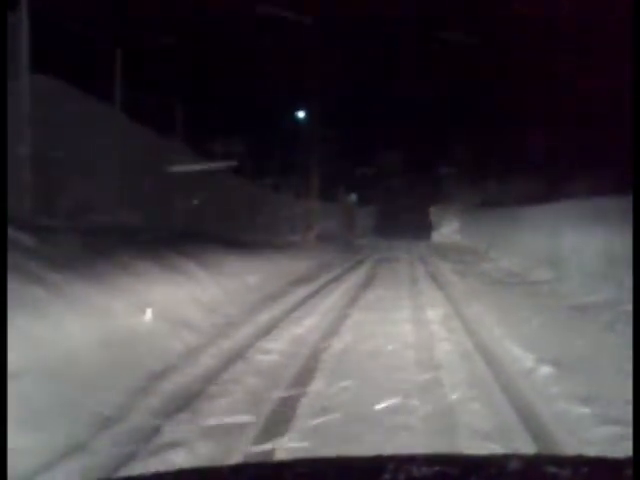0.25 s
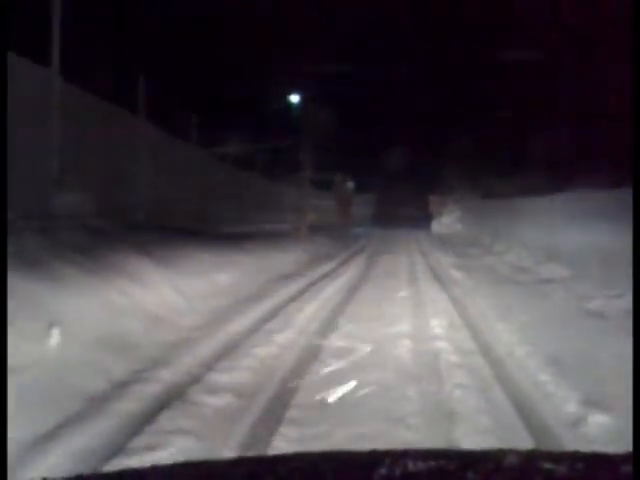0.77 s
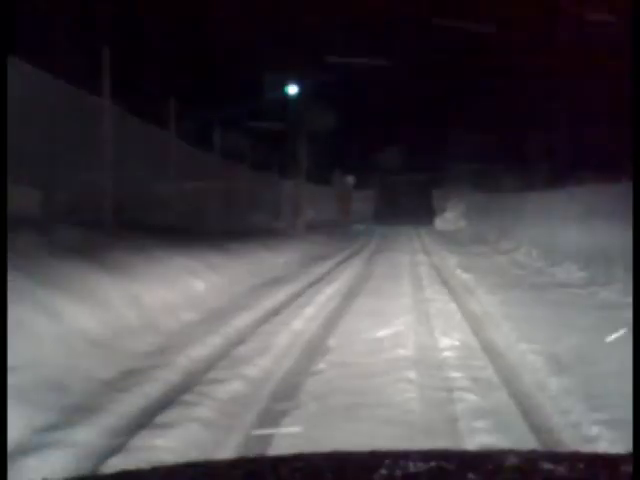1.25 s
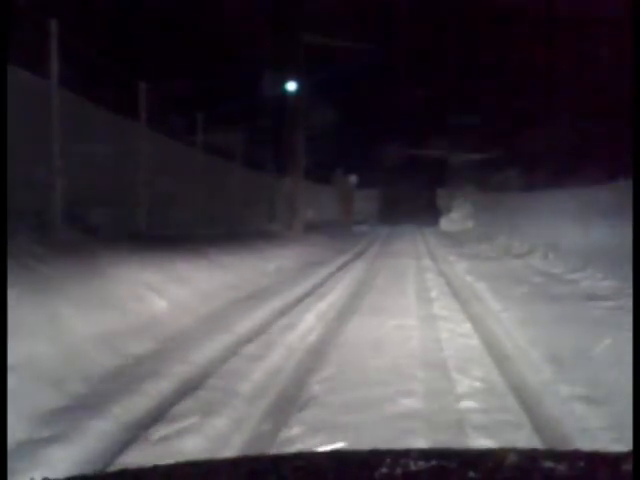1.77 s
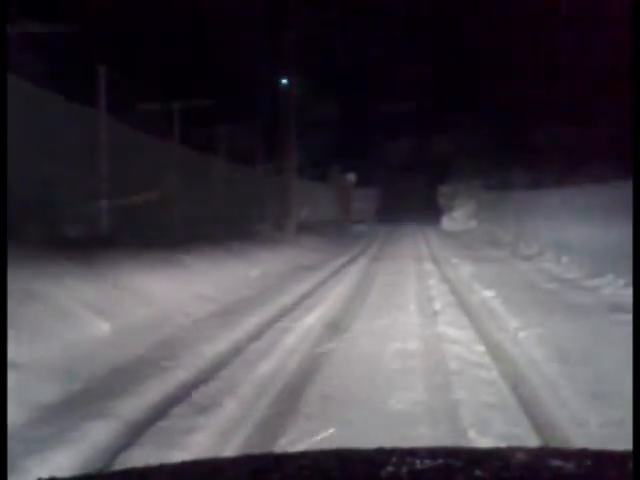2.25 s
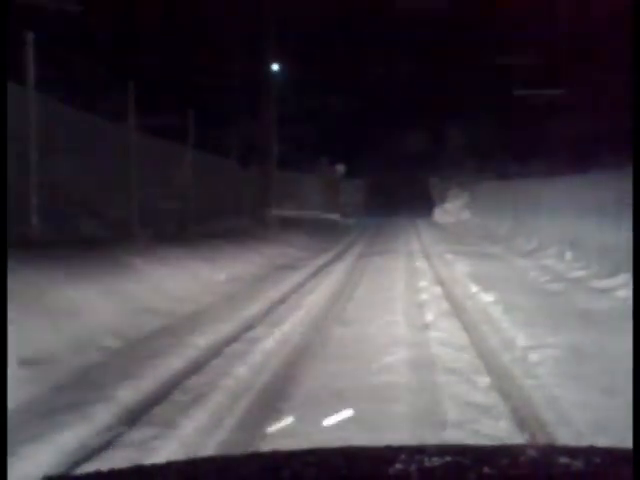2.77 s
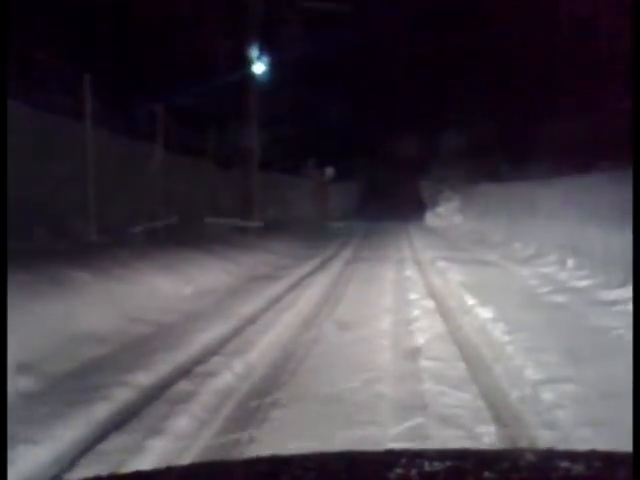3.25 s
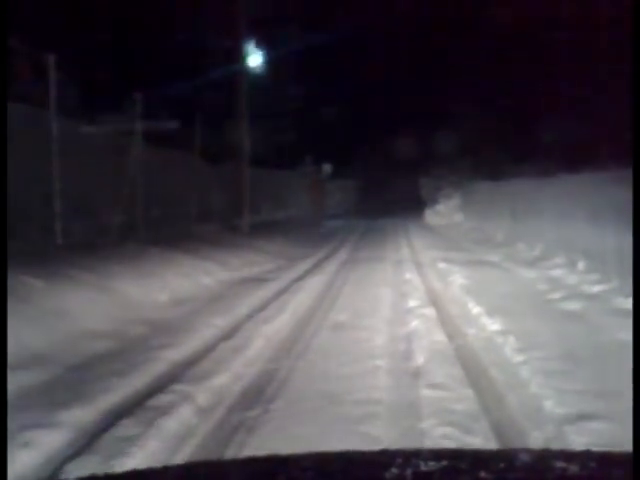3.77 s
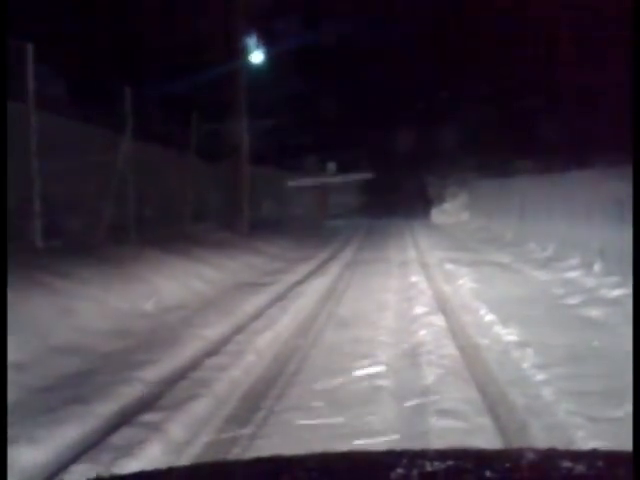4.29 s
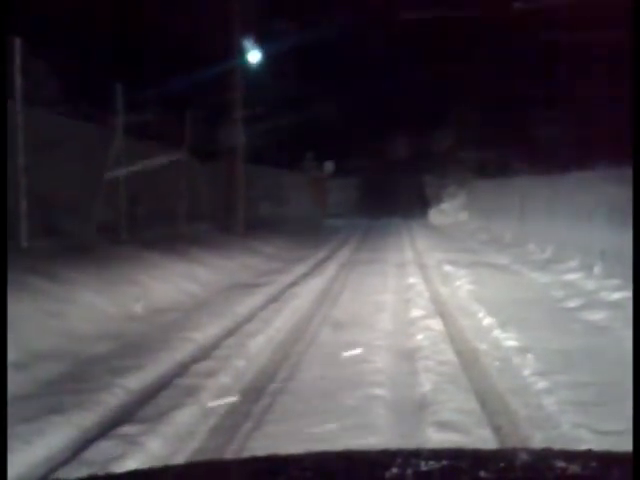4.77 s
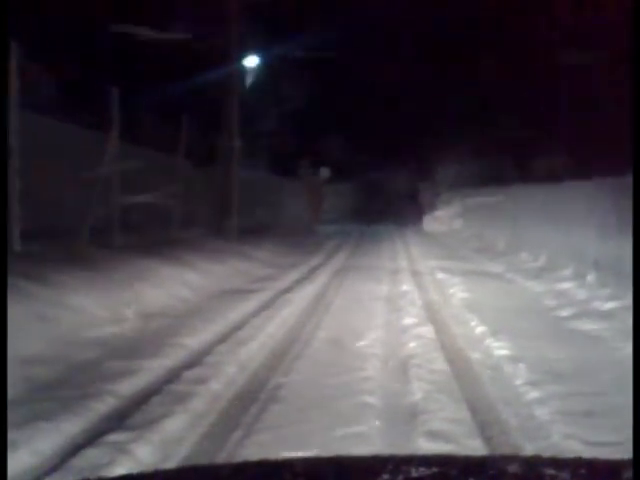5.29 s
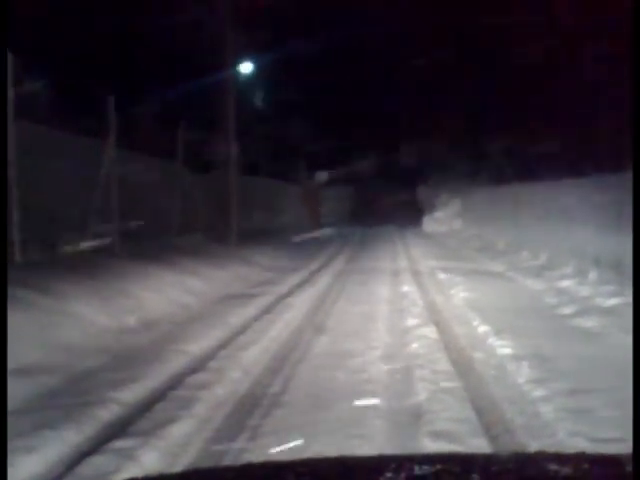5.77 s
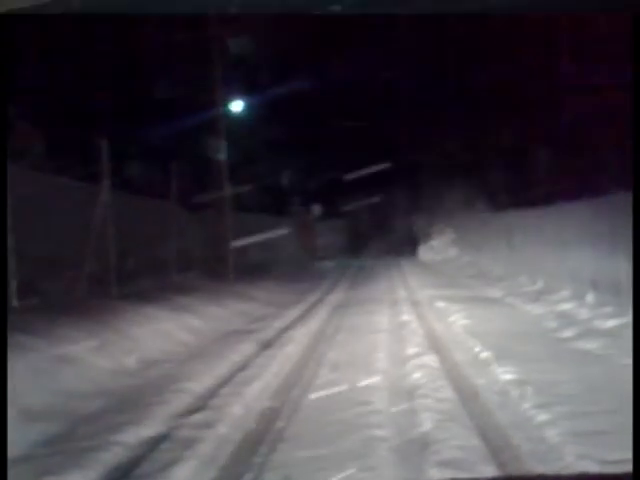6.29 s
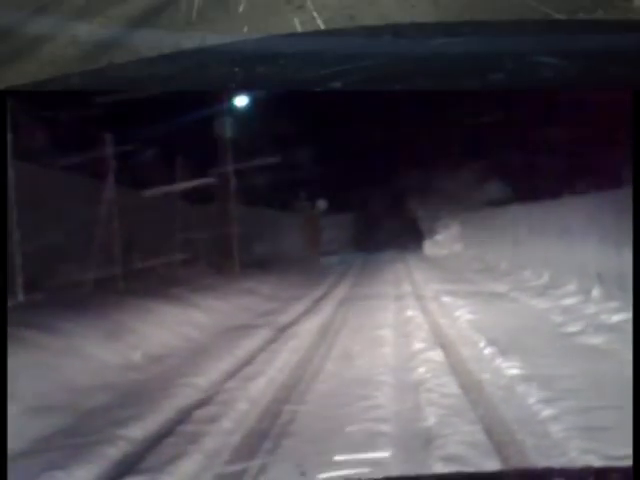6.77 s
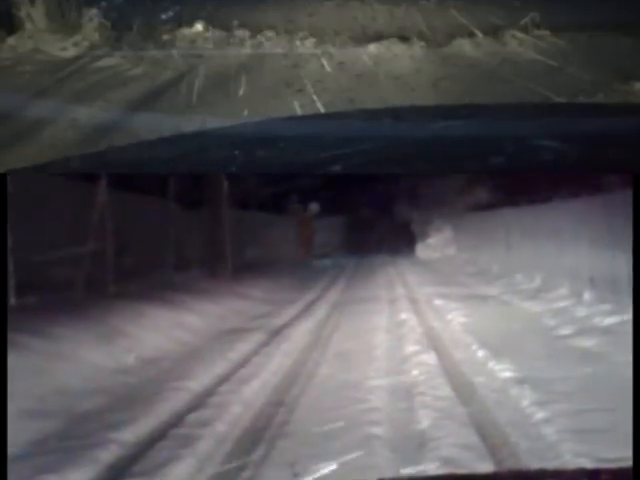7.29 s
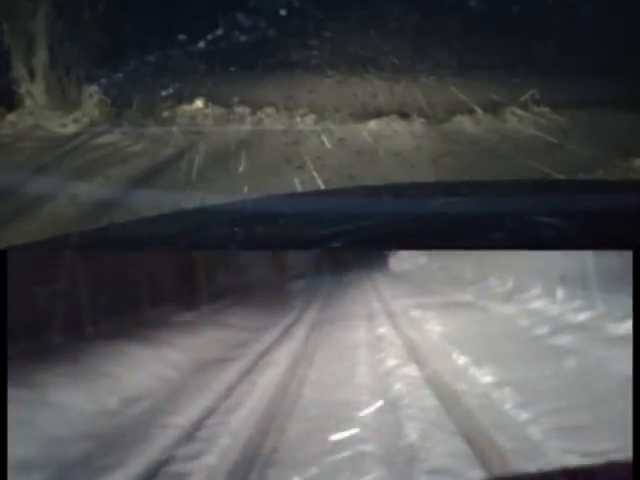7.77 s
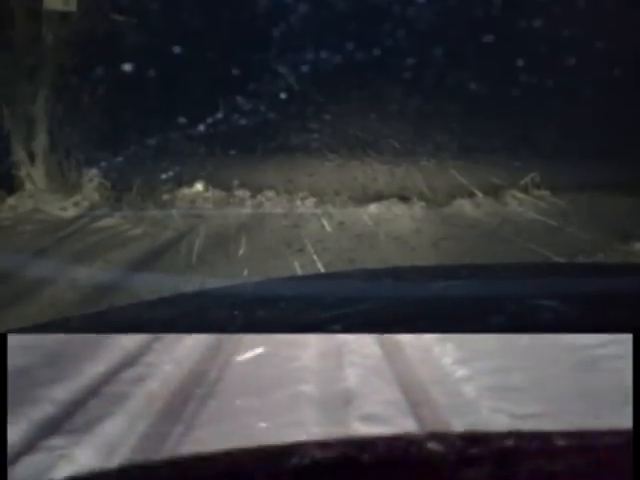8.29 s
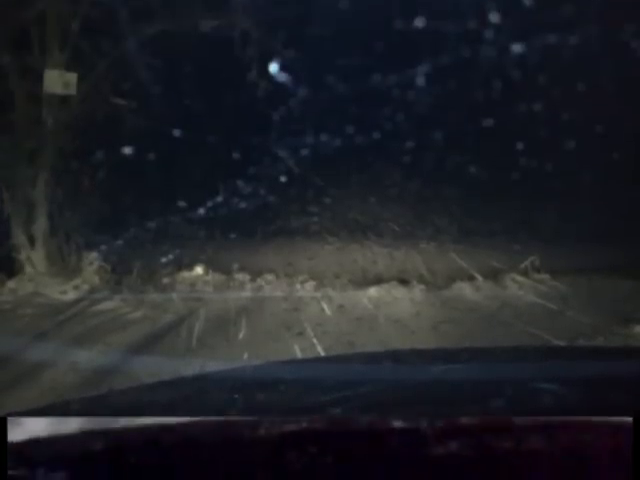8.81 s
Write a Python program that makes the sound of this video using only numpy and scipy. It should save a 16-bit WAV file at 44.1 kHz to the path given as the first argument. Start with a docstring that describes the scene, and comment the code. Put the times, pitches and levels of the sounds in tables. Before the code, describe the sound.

A close, boxy car-cabin sound, dominated by low frequencies. Engine drone surges several times, slides down in pitch and settles into idle, with tyre roar, faint snow hiss and a steady blower tone. Muffled thumps come and go. Then one dense burst of sharp knocks shakes the dashboard, followed by scattered trim rattles, panel knocks, brief squeaks and soft snow brushing as engine and road noise sink towards silence.

```python
"""Inside a car rolling slowly along a snowy road: the engine booms over humps, then drops to idle.
Swept sines make the engine and heater fan; shaped noise makes tyre rumble, roar and snow hiss throughout.
Trim noise bursts tick, gliding tones creak and snow swishes; soon ruts thump as short decaying sines.
Late on, a loose panel rings and a hard jolt sets the dashboard's modes clattering;
from then the running noise sinks steadily while thumps, rattles, creaks and swishes go on."""
import sys
import numpy as np
from scipy import signal
from scipy.fft import rfft, irfft, next_fast_len
from scipy.io import wavfile

SR = 44100
rng = np.random.default_rng(int(sys.argv[2]) if len(sys.argv) > 2 else 0)


def log_audio(samples):
    """Write samples as a 16-bit WAV file to the path given in sys.argv[1]."""
    # one column per channel
    frames = np.atleast_2d(samples).T
    # limit to full scale, then quantise
    limited = np.clip(frames, -1, 1)
    pcm = np.round(limited * 32767).astype(np.int16)
    wavfile.write(sys.argv[1], SR, pcm)


N = 398663
TIME = np.arange(N) / SR

# tread roar spectrum, also excited by ruts: freq_hz, relative density_db
TREAD_ROAR = [(70, -8), (130, -3.5), (188, -2.5), (260, -8), (320, -3), (380, -6), (450, -11.5), (520, -17),
              (620, -17), (720, -20), (900, -25.5), (1000, -27.5), (1050, -32), (1110, -26), (1220, -34.5),
              (1280, -33), (1400, -38), (1480, -35.5), (1580, -38.5), (2130, -48), (3900, -81)]


def from_db(db):
    """Decibels to amplitude gain."""
    return 10 ** (np.asarray(db) / 20)


def rms_one(x):
    """Scale to unit rms."""
    return x / np.sqrt(np.mean(x ** 2) + 1e-20)


def in_time(rows):
    """Interpolate each column of a time curve at every sample."""
    time_s, *columns = np.transpose(rows)
    return [np.interp(TIME, time_s, column) for column in columns]


def at_hz(points, hz):
    """Interpolate a spectrum in dB on a log-frequency axis."""
    freqs_hz, levels_db = np.transpose(points)
    return np.interp(np.log(hz), np.log(freqs_hz), levels_db)


def coloured(x, spectrum):
    """Filter a steady signal by a spectrum with steep outer edges; unit rms."""
    size = next_fast_len(N, True)
    hz = np.maximum(np.arange(size // 2 + 1) * SR / size, 1)
    low_edge = 1 / (1 + (spectrum[0][0] / hz) ** 4)
    high_edge = 1 / (1 + (hz / spectrum[-1][0]) ** 8)
    gain = from_db(at_hz(spectrum, hz)) * low_edge * high_edge
    return rms_one(irfft(rfft(x, size) * gain, size)[:N])


def noise(spectrum):
    """Gaussian noise of a given spectrum, unit rms."""
    return coloured(rng.standard_normal(N), spectrum)


def drift(rate_hz):
    """Slow random wander of about unit rms: two-pole low-passed noise."""
    step = 40  # samples per control point
    pole = np.exp(-2 * step * np.pi * rate_hz / SR)
    white = rng.standard_normal(N // step + 2002)
    slow = signal.lfilter([1], [1, -2 * pole, pole * pole], white)[2000:]  # drop the settling
    return np.interp(np.arange(N) / step, np.arange(len(slow)), rms_one(slow))


def ring(force, hz, t60_s):
    """Two-pole resonator: a unit click starts a decaying sine of height about 1."""
    radius = from_db(-60 / (t60_s * SR))
    angle = 2 * np.pi * hz / SR
    poles = [1, -2 * radius * np.cos(angle), radius * radius]
    return signal.lfilter([0, np.sin(angle)], poles, force + 1e-18)


def burst(start_s, length_s, rise_s, t60_s):
    """Sample span and envelope of a contact that rises, holds and decays."""
    t = np.arange(int((length_s + t60_s) * SR)) / SR
    at = round(start_s * SR)
    rise = 1 - np.exp(-t / rise_s)
    decay = np.exp(-np.log(1000) * np.maximum(t - length_s, 0) / t60_s)
    return slice(at, min(at + len(t), N)), (rise * decay)[:N - at]


def engine(overtone_db=-35.0, uneven_db=-9.0, waver_db=2.0):
    """Firing tone and overtones sweep through the cabin boom; unequal cylinders add half orders."""
    # engine speed: time_s, firing_hz
    firing_curve = [(0, 53.23), (.4, 54.81), (1.5, 55.88), (1.94, 53.56), (2.14, 50.65), (3.1, 45.78),
                    (3.42, 36.94), (3.9, 35.32), (5.13, 35.59), (5.36, 33.05), (6.02, 34.43), (9.04, 32.65)]
    # exhaust and cabin response to overtones: freq_hz, gain_db
    boom = [(48, -2), (68, 1), (100, -16), (132, -8), (160, -12), (182, 3), (203, 0), (230, -17),
            (305, -4.5), (400, -20.5), (700, -31.5)]
    idle_hz, idle_db = 34, -26.5
    load_db_per_octave, throb_db_per_octave = -2, 3.5  # level slope; unsteadiness above idle
    slack_at_s, slack_half_width_s, slack_db = 2.6, .06, -14  # brief dropout on the way to idle

    hz, = in_time(firing_curve)
    phase = 2 * np.pi * np.cumsum(hz) / SR
    load_octaves = np.log2(hz / idle_hz)
    load_db = load_octaves * (load_db_per_octave + throb_db_per_octave * drift(6.7))
    dropout_db = slack_db * np.exp(-((TIME - slack_at_s) / slack_half_width_s) ** 2)
    out = from_db(idle_db + load_db + humps() + dropout_db) * np.sin(phase)
    for k in range(3, 25):  # k counts half orders; the firing tone is k = 2
        half = k % 2 and k > 3  # k = 3 is not reduced
        gain_db = overtone_db + at_hz(boom, hz * k / 2) + uneven_db * half + waver_db * drift(2.5)
        out += from_db(gain_db) * np.sin(phase * k / 2 + rng.uniform(0, 2 * np.pi))
    return np.sqrt(2) * out  # sine levels are rms


def humps():
    """Swell in dB as snow humps load the drive and shake the body."""
    # snow humps: centre_s, gain_db
    hump_rows = [(.08, 11), (.3, 8), (.55, 5.5), (.69, 15), (.81, 5), (1.02, 11), (1.39, 9.5), (1.6, 10.5),
                 (1.85, 8.5), (2.75, 5), (2.88, 7), (2.99, 5), (3.15, 4)]
    half_width_s = 0.055
    return sum(db * np.exp(-((TIME - s) / half_width_s) ** 2) for s, db in hump_rows)


def jolt(crack_db=-13.5, crack_t60_s=0.046, ring_db=-13.5):
    """A volley of blows: each cracks brightly and excites the dashboard's modes."""
    # blows of the jolt: start_s, relative level_db
    blows = [(6.134, -5), (6.140, -3.5), (6.146, 0), (6.151, -1.5), (6.157, 1), (6.164, -1.5), (6.168, 0),
             (6.173, -3), (6.179, 2), (6.185, -4), (6.191, -11.5), (6.198, 0), (6.205, -11), (6.209, -10)]
    # dashboard modes: freq_hz, relative level_db, t60_s
    dash_modes = [(97.3, -4, 0.12), (118, -8.5, .2), (160.4, -2.5, 0.084), (219.2, -8, 0.05),
                  (254, -7, 0.1), (287, 2, 0.085), (378, -6.5, 0.21), (421, -4.5, 0.046), (474, 2.5, 0.1),
                  (492, -6.5, 0.08), (539, -11, .06), (639, -16.5, 0.087), (960, -21.5, 0.18),
                  (1470, -23.5, 0.055), (2800, -18.5, .045), (3080, -19, .04), (3160, -18.5, .045),
                  (3430, -21.5, 0.045), (4130, -22.5, .04), (4460, -17.5, .045), (4550, -16.5, .045),
                  (4620, -20.5, .04), (5400, -25, .035), (8080, -26.5, .03)]
    # crack spectrum: freq_hz, relative density_db
    clatter = [(350, -43), (600, 1.5), (735, 3.5), (808, -15), (889, -6), (1260, -15.5), (1410, -14),
               (1730, -10.5), (2420, -9), (3090, -1), (3680, -2), (4450, -1), (5760, -9.5), (8080, -9),
               (15300, -16.5)]

    force, crack_power = np.zeros(N), np.zeros(N)
    for s, level_db in blows:
        force[round(s * SR)] = from_db(level_db)
        span, shape = burst(s, 0.0011, 0.00034, crack_t60_s)
        crack_power[span] += (from_db(level_db) * shape) ** 2
    out = cabin(from_db(crack_db) * np.sqrt(crack_power) * noise(clatter))
    volley_samples = (blows[-1][0] - blows[0][0]) * SR
    for hz, level_db, t60_s in dash_modes:
        # each blow's push depends on the mode's phase and on chance
        push = force * (np.cos(2 * np.pi * hz * TIME) + 0.74 * rng.standard_normal(N))
        # mode energy is referred to the length of the volley
        tone = rms_one(ring(push, hz, t60_s)) * np.sqrt(volley_samples / N)
        out += from_db(ring_db + level_db) * tone
    return out


def thumps(rise_s=0.0011, soft_hz=600, shake_db=-11.5, shake_t60_s=0.067):
    """Ruts push the cushioned body, which rings low, and briefly shake the roaring panels."""
    # ruts under the wheels: start_s, level_db, pitch_hz, t60_s
    ruts = [(2.649, -29, 571, 0.052), (2.823, -21, 242, 0.21), (2.862, -12.5, 251, 0.079),
            (3.14, -20.5, 21, .3), (3.341, -15, 24.2, 0.3), (3.746, -18, 197, 0.083), (3.8, -15, 96, 0.17),
            (4.022, -10, 53.6, 0.16), (4.162, -13, 52.7, 0.59), (4.251, -16.5, 49.74, 0.14),
            (5.014, -7.5, 228, 0.061), (6.307, -4, 120, 0.11), (6.700, -26.5, 610, 0.13),
            (6.777, -19.5, 516.4, 0.055), (6.883, -14, 330, 0.059), (6.895, -10.5, 238, 0.075),
            (6.907, -13, 242, 0.064), (6.938, -14, 263, 0.068), (7.041, -21, 408, 0.032),
            (7.483, -12.5, 243, 0.061), (7.492, -17, 307, 0.088), (7.513, -19.5, 220, .1),
            (7.634, -20, 284, 0.072), (7.742, -19, 233, 0.076), (8.18, -29.5, 130, .3),
            (8.376, -19, 132, 0.062), (8.377, -19, 265, 0.034), (8.38, -33, 474, 0.022)]
    out, shake = np.zeros(N), np.zeros(N)
    for s, level_db, hz, t60_s in ruts:
        span, shape = burst(s, 2 * rise_s, rise_s, t60_s)
        out[span] -= from_db(level_db) * shape * np.sin(2 * np.pi * hz * (TIME[span] - s))
        span, shape = burst(s, 2 * rise_s, rise_s, shake_t60_s)
        shake[span] += from_db(level_db + shake_db) * shape
    lowpass = signal.butter(2, soft_hz, fs=SR, output="sos")
    return signal.sosfilt(lowpass, out) + shake * noise(TREAD_ROAR)


def tyres(rumble_db=-26.5, drumming_db=-23.0, lumpy_db=2.6, patchy_db=1.0):
    """Uneven snow shakes the body and drums on the floor, and the tread roars."""
    # unevenness of the packed snow: time_s, swing_db
    road = [(0, -0.5), (2.85, 0.5), (3.4, -5), (3.7, -6.5), (5.2, -10), (5.8, -18), (7.2, -6.5), (8, -18.5),
            (9.04, -8)]
    # body rumble spectrum: freq_hz, relative density_db
    rumble_spectrum = [(12, -6), (22, -1), (33, -8.5), (50, 11.5), (65, -6), (90, -17), (200, -37)]
    # floor drumming spectrum: freq_hz, relative density_db
    drumming_spectrum = [(50, -12.5), (72, 0.5), (95, 1.5), (115, -2), (133, -2), (165, -13.5), (230, -23),
                         (500, -51)]
    # tread roar: time_s, level_db
    roar_curve = [(0, -29.5), (1.5, -29), (2.7, -28), (4.3, -29), (5.7, -27.5), (6.6, -28), (7.3, -27.5),
                  (7.9, -28.5), (9.04, -25)]
    rumble_road_share, rumble_hump_share, drum_hump_share = 0.39, 0.36, 0.097  # dB per dB

    road_db, = in_time(road)
    swell_db = humps()
    rumble_level_db = rumble_db + rumble_road_share * road_db + rumble_hump_share * swell_db
    rumble = from_db(rumble_level_db) * noise(rumble_spectrum)
    drumming_level_db = drumming_db + road_db + drum_hump_share * swell_db + lumpy_db * drift(9)
    drumming = from_db(drumming_level_db) * noise(drumming_spectrum)
    roar_level_db = in_time(roar_curve)[0] + patchy_db * drift(25)
    return rumble + drumming + from_db(roar_level_db) * noise(TREAD_ROAR)


def rattles(t60_s=0.037, t60_per_length=1.9, rise_share=0.19, chatter_db=3.0, part_q=4.5, part_db=-5.5):
    """Loose trim buzzes in uneven contacts: short ones tick, long ones swell; each part resonates."""
    # trim contacts: start_s, length_s, level_db, top_edge_hz, resonance_hz
    contacts = [(1.833, 0.03, -45.5, 4500, 1200), (1.856, 0.028, -41.5, 5200, 1430),
                (1.876, 0.0091, -50, 9000, 3070), (1.897, 0.029, -47.5, 5400, 1500),
                (1.932, 0.014, -39.5, 2600, 1150), (2.647, 0.0089, -38.5, 3700, 1250),
                (2.747, 0.011, -40.5, 2960, 1250), (2.814, 0.0068, -39.5, 8100, 1300),
                (2.857, 0.0072, -38, 8000, 1400), (3.733, 0.0074, -44, 4200, 2200),
                (4.024, 0.0064, -42, 12000, 1980), (4.946, 0.012, -46, 2463, 1500),
                (5.006, 0.015, -48, 2480, 1490), (5.11, .05, -53.5, 2800, 1500),
                (5.767, 0.058, -43, 2940, 1500), (6.282, .01, -51.5, 4000, 2870),
                (6.599, 0.0088, -51, 8000, 3600), (6.697, 0.024, -39, 3500, 1090),
                (6.756, 0.004, -33, 2900, 1100), (6.775, 0.0038, -27.5, 3780, 899),
                (6.784, 0.0049, -46, 5950, 1840), (6.886, 0.015, -41, 2700, 810),
                (6.936, 0.0049, -35.5, 2570, 1450), (6.999, 0.043, -45.5, 8000, 5850),
                (7.024, 0.032, -37.5, 12800, 10600), (7.074, 0.0025, -23.5, 4250, 2720),
                (7.081, 0.005, -39, 3600, 2600), (7.472, 0.0088, -26.5, 14300, 4450),
                (7.485, 0.01, -25.5, 14200, 4970), (7.514, 0.013, -45, 4990, 1465),
                (7.599, 0.0061, -38.5, 12600, 7000), (7.631, 0.014, -34, 11400, 1700),
                (7.684, 0.012, -47.5, 3770, 1490), (7.741, 0.011, -46.5, 4400, 1700),
                (7.893, 0.0044, -48, 4500, 2170), (7.927, .004, -50, 6000, 2600),
                (7.953, 0.0058, -45, 4000, 2520), (8.144, .016, -45, 5970, 2110),
                (8.185, 0.044, -49, 8040, 3000), (8.272, 0.0091, -50, 7000, 4500),
                (8.377, 0.0077, -41, 7450, 2300), (8.395, .012, -49, 4000, 2200),
                (8.74, 0.0038, -43, 9200, 2000), (8.793, 0.0027, -52, 3500, 2000),
                (8.795, 0.012, -58, 9100, 3970), (8.868, 0.0017, -46.5, 6860, 1992),
                (8.887, 0.0088, -56.5, 4500, 2097)]
    # trim spectrum: freq_hz, relative density_db
    trim = [(250, 12.5), (600, 13.5), (900, 7.5), (1250, 2.5), (1550, 2.5), (2000, 3), (2700, 0.5),
            (3400, 1.5), (4400, -1), (6000, 0), (8000, -0.5), (11000, -1), (15500, 6)]
    buzz = noise(trim) * rms_one(from_db(chatter_db * drift(200)))
    out = np.zeros(N)
    for s, length_s, level_db, edge_hz, part_hz in contacts:
        span, shape = burst(s, length_s, rise_share * length_s, t60_s + t60_per_length * length_s)
        lowpass = signal.butter(4, edge_hz, fs=SR, output="sos")
        contact = signal.sosfilt(lowpass, buzz[span])
        band_hz = part_hz * np.exp(np.array([-1, 1]) / (2 * part_q))
        bandpass = signal.butter(2, band_hz, "band", fs=SR, output="sos")
        part = signal.sosfilt(bandpass, rng.standard_normal(len(shape)))
        out[span] += from_db(level_db) * shape * (rms_one(contact) + from_db(part_db) * rms_one(part))
    return out


def cabin(x):
    """Near reflections off windscreen, side glass and roof colour a sound, keeping its nominal power."""
    # reflections: delay_s, level_db
    reflections = [(.0007, -13), (.0019, -14.5), (.0028, -16.5), (.0053, -12)]
    out, power = x.copy(), 1
    for delay_s, level_db in reflections:
        out += from_db(level_db) * np.interp(TIME - delay_s, TIME, x, left=0)
        power += from_db(2 * level_db)
    return out / np.sqrt(power)


def panel(rise_s=0.0017, vary_db=0.5, chatter_db=2.5):
    """Knocks ring a loose panel's modes in a new mix each time; chatter in its clips makes them uneven."""
    # panel modes: freq_hz, relative level_db, t60_s
    panel_modes = [(560.2, 3, 0.076), (1446, -1.5, 0.17), (1700, -15, 0.09), (2430, -10, 0.098),
                   (4300, -8, 0.05), (5180, -15, 0.041)]
    # knocks: start_s, level_db
    knocks = [(5.765, -52), (5.79, -47), (7.475, -43), (7.494, -35.5), (7.602, -42), (7.641, -37),
              (7.688, -52)]
    out = np.zeros(N)
    for hz, mode_db, t60_s in panel_modes:
        chatter = rms_one(from_db(chatter_db * drift(120)))
        for s, level_db in knocks:
            span, shape = burst(s, rise_s, rise_s, t60_s)
            gain = from_db(level_db + mode_db + vary_db * rng.standard_normal())
            out[span] += gain * shape * chatter[span] * np.sin(2 * np.pi * hz * (TIME[span] - s))
    return out


def creaks(rise_s=0.00049, t60_s=0.042, overtone_db_per_octave=-15.0, grit_db=5.0):
    """Plastic sticks and slips ever faster as load grows, gliding up; uneven slips sound gritty."""
    # creaks: start_s, length_s, level_db, start_hz, end_hz, pitch unsteadiness (0-1)
    slides = [(1.864, 0.019, -35, 1090, 1590, 0.06), (7.013, 0.0065, -34, 1060, 1135, 0.09),
              (7.015, 0.019, -33.5, 1620, 1650, 0), (7.046, 0.011, -33.5, 2700, 3050, 0.01),
              (7.093, 0.017, -44.5, 3803, 3830, 0.01), (8.21, 0.024, -42.5, 3070, 4400, 0.07),
              (8.226, .01, -49, 4300, 5300, .06), (8.27, .012, -50, 3930, 4600, .08)]
    out, wobble, grit = np.zeros(N), drift(700), drift(900)
    for s, length_s, level_db, start_hz, end_hz, jitter in slides:
        span, shape = burst(s, length_s, rise_s, t60_s)
        glide_hz = np.interp(TIME[span], [s, s + length_s], [start_hz, end_hz])
        phase = 2 * np.pi * np.cumsum(glide_hz * (1 + jitter * wobble[span])) / SR
        slips = sum(from_db(overtone_db_per_octave * np.log2(k)) * np.sin(k * phase) for k in range(1, 4))
        out[span] += from_db(level_db) * shape * slips * rms_one(from_db(grit_db * grit[span]))
    return out


def swishes(rise_share=0.26, t60_s=0.21, crunch_share=.35):
    """Tyres brush loose snow, which sprays and crunches in small lumps; fine powder sounds brighter."""
    # swishes: start_s, length_s, level_db, fine powder's power share (0-1)
    sprays = [(1.98, 0.1, -58.5, 0.01), (2.347, 0.096, -59.5, 0.01), (2.874, 0.043, -58, 0),
              (3.298, 0.21, -61, .2), (5.149, 0.088, -63, .1), (6.35, 0.09, -57, 0.6),
              (6.503, 0.084, -49.5, 0.02), (7.648, 0.29, -56.5, 0.05), (7.962, 0.21, -55.5, 0.09),
              (8.197, 0.21, -60, .05), (8.452, .2, -66, 0), (8.633, 0.095, -61.5, 0)]
    # clumped snow spectrum: freq_hz, relative density_db
    clump_spectrum = [(1500, 12), (3000, 7), (4800, 0.5), (7000, -14.5), (12500, -23)]
    # fine powder spectrum: freq_hz, relative density_db
    powder_spectrum = [(3000, -1.5), (6500, 1.5), (9000, -7.5), (13000, -6)]
    clumps, powder, out = noise(clump_spectrum), noise(powder_spectrum), np.zeros(N)
    for s, length_s, level_db, fine in sprays:
        span, shape = burst(s, length_s, rise_share * length_s, t60_s)
        snow = np.sqrt(1 - fine) * clumps[span] + np.sqrt(fine) * powder[span]
        out[span] += from_db(level_db) * shape * snow
    return out * np.sqrt(1 - crunch_share + crunch_share * crunch() ** 2)  # shares of power


def crunch(lumps_per_s=260, size_db=5.0, t60_s=0.014):
    """Unit-rms envelope of small snow lumps crushed at random times, each decaying in power."""
    struck = rng.random(N) < lumps_per_s / SR
    lumps = struck * from_db(size_db * np.minimum(rng.exponential(1, N), 3))
    power_decay = from_db(-60 / (t60_s * SR)) ** 2
    power = signal.lfilter([1], [1, -power_decay], lumps ** 2 + 1e-18)
    return rms_one(np.sqrt(power))


def hiss(grain_db=2.0, spray_hz=7000, spray_db_per_db=0.77):
    """Loose grains hiss in the wheel arches; the more snow is thrown, the brighter the spray."""
    # hiss: time_s, level_db
    hiss_curve = [(0, -67), (1.7, -66.5), (2.1, -64.5), (4.5, -64), (5.2, -63), (6.5, -61), (6.8, -62),
                  (7.45, -64.5), (7.7, -63.5), (9.04, -53.5)]
    # grain spectrum: freq_hz, relative density_db
    grain_spectrum = [(1200, -9), (2200, 2), (3200, -1), (5000, -5.5), (7000, -10), (10000, -12.5),
                      (12200, -10.5), (13500, -27)]
    level_db, = in_time(hiss_curve)
    uneven = rng.standard_normal(N) * from_db(grain_db * rng.standard_normal(N))
    grains = coloured(uneven, grain_spectrum)
    lowpass = signal.butter(2, spray_hz, fs=SR, output="sos")
    coarse = signal.sosfiltfilt(lowpass, grains)
    spray = from_db(spray_db_per_db * (level_db - level_db.mean())) * (grains - coarse)
    return from_db(level_db) * (coarse + spray)


def fan(level_db=-33, waver_db=1.75, wander_hz=0.25):
    """The heater blower's blade tone, wavering a little in pitch and strength."""
    # fan speed: time_s, blade_hz
    blade_curve = [(0, 331.7), (1.35, 330), (1.55, 333), (2.6, 331.4), (4.6, 335.8), (4.95, 337.8),
                   (6.5, 332.9), (9.04, 334.8)]
    hz = in_time(blade_curve)[0] + wander_hz * drift(4.16)
    gain = np.sqrt(2) * from_db(level_db + waver_db * drift(5.0))
    return gain * np.sin(2 * np.pi * np.cumsum(hz) / SR)


def scene():
    """Everything as heard at the windscreen; only the running noise fades."""
    fade_start_s, fade_end_s = 6.17, 9.11
    fade = np.clip((fade_end_s - TIME) / (fade_end_s - fade_start_s), 0, 1)
    running = engine() + tyres() + hiss() + fan()
    contacts = jolt() + thumps() + cabin(rattles()) + panel() + creaks() + swishes()
    return (fade * running + contacts)[None]


def record(dry, top=1.0, cutoff_hz=15200):
    """Round the loudest peaks with tanh, then cut the top steeply."""
    lowpass = signal.ellip(10, .1, 80, cutoff_hz, fs=SR, output="sos")
    return signal.sosfilt(lowpass, top * np.tanh(dry / top))


dry = scene()
out = record(dry)
log_audio(out)
```